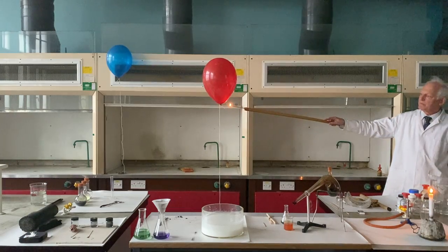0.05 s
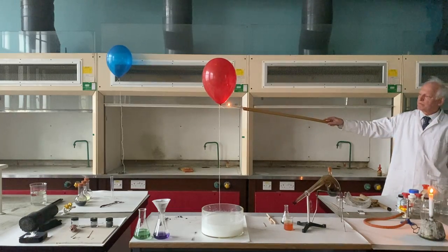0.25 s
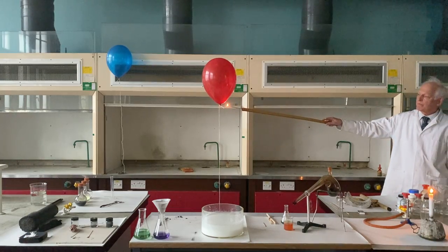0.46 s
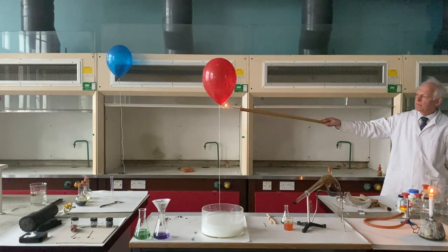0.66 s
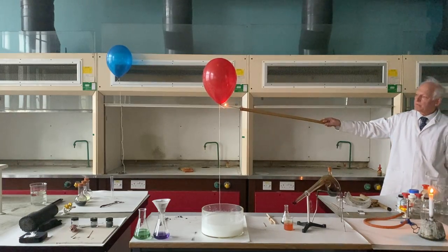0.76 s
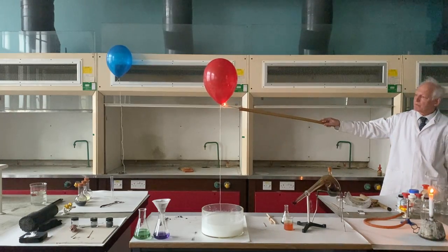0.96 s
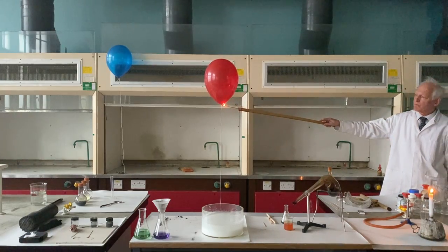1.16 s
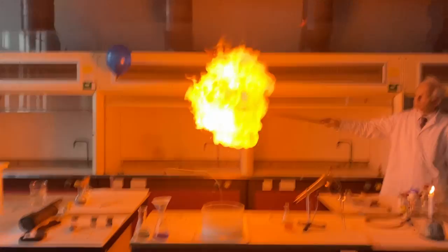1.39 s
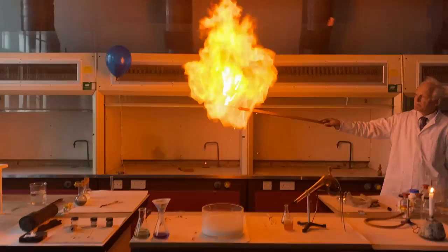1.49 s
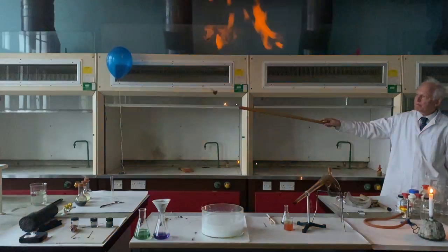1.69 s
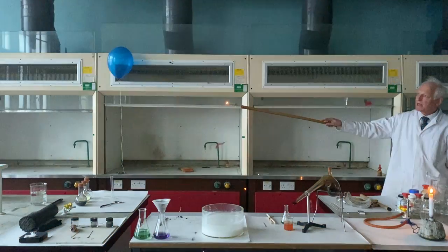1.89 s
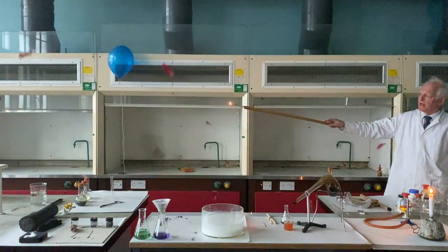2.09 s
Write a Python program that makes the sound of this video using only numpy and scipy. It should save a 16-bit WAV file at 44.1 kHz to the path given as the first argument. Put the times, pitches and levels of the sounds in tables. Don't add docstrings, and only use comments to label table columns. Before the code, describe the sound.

A hydrogen balloon explosion: low, rushing extractor fans hum steadily from the start, with one barely audible dry tick near 1.26 seconds. At 1.36 a violent bang hits abruptly, crunchy and clipped at the microphone, with a short fireball roar. Deep hums and dense echoes in the hard-walled laboratory fade gradually, while faint, bright glassware tinkles around 2.04 to 2.15 seconds.

```python
import sys
import numpy as np
from scipy import signal
from scipy.io import wavfile

SR = 44100
rng = np.random.default_rng(int(sys.argv[2]) if len(sys.argv) > 2 else 0)


def store_wav(level_fs):
    pcm = np.round(np.clip(np.atleast_2d(level_fs), -1, 1) * 32767)
    wavfile.write(sys.argv[1], SR, pcm.T.astype(np.int16))


def attenuation_scalar(level_db):
    decades = np.asarray(level_db, float) / 20
    return 10 ** decades


N = 94241


def at_hz(points, hz):
    pitches, values = np.transpose(points)
    return np.interp(np.log(hz), np.log(pitches), values)


def rms_one(x):
    return x / np.sqrt(np.mean(x ** 2) + 1e-20)


def filtered(x, order, cut_hz, kind="low"):
    return signal.sosfilt(signal.butter(order, cut_hz, kind, fs=SR, output="sos"), x)


def ring(x, hz, t60_s):
    decay = attenuation_scalar(-60 / (t60_s * SR))
    turn = 2 * np.pi * hz / SR
    return signal.lfilter([0, np.sin(turn)], [1, -2 * decay * np.cos(turn), decay ** 2], x + 1e-18)


def noise_bands():
    edges_hz = 20 * 2 ** np.arange(0, 10, 1 / 3)
    white = rng.standard_normal((2, N))
    bands = []
    for k, (low, high) in enumerate(zip(edges_hz, edges_hz[1:])):
        bands.append((np.sqrt(low * high), filtered(white[k % 2], 4, [low, high], "band")))
    return bands


def fans():
    # pitch_hz [Hz], density_db [dB per Hz]
    air_colour = [(25, 4), (160, -6.5), (220, -17), (570, -15), (830, -21.5), (2500, -34.5), (6500, -51),
                  (15000, -65)]
    # pitch_hz [Hz], width_hz [Hz], level_db [dB]
    ducts = [(63, 2.7, -47), (108.5, 15, -45), (132, 8, -84), (180.4, 15, -47.5), (235.4, 16, -54),
             (262.6, 2.1, -55.5), (361.6, 24, -57.5), (573, 33, -53)]
    air = sum(attenuation_scalar(at_hz(air_colour, hz)) * band for hz, band in noise_bands())
    out = attenuation_scalar(-41.5) * rms_one(air)
    for hz, width_hz, level_db in ducts:
        hum = ring(rng.standard_normal(N + SR), hz, 4.9 / width_hz)
        out += attenuation_scalar(level_db) * rms_one(hum[SR:])
    return out


def tick():
    start_s, level_db = 1.263, -47
    click = attenuation_scalar(level_db) * (np.arange(N) == int(start_s * SR))
    return filtered(click, 2, [4500, 16000], "band")


def glassware():
    # start_s [s], strength_db [dB]
    touches = [
        (2.038, -53.5),
        (2.048, -55),
        (2.059, -56),
        (2.071, -87),
        (2.088, -55),
        (2.104, -62),
        (2.117, -62),
    ]
    # pitch_hz [Hz], level_db [dB], t60_s [s]
    glass_modes = [(4630, -9, .03), (4900, -6, .06), (5507, -4, .05), (5905, -7, .05), (6433, -3, .04),
                   (7133, -7, .25), (7881, -12, .12), (8450, -12, .05), (9598, -15, .06), (10220, -10, .04),
                   (10340, -9, .07), (12030, -18, .08), (13830, -10, .07), (15600, -11, .1)]
    chatter_count, chatter_s, chatter_db = 6, 0.033, -2.5
    scuff_db, scuff_t60_s = 6, 0.024

    touch_s, touch_db = np.transpose(touches)
    later_s = touch_s[:, None] + chatter_s * rng.random((len(touch_s), chatter_count))
    start_s = np.concatenate([touch_s, later_s.ravel()])
    strength_db = np.concatenate([touch_db, np.repeat(touch_db, chatter_count) + chatter_db])
    at = np.minimum((start_s * SR).astype(int), N - 1)

    luck_db = rng.normal(0, 3.9, (len(start_s), len(glass_modes)))
    clicks, ringing = np.zeros(N), np.zeros(N)
    for k, (hz, level_db, t60_s) in enumerate(glass_modes):
        clicks[at] = attenuation_scalar(strength_db + level_db + luck_db[:, k])
        ringing += ring(clicks, hz, t60_s)

    clicks[at] = attenuation_scalar(strength_db + scuff_db)
    fading = signal.lfilter([1], [1, -attenuation_scalar(-60 / (scuff_t60_s * SR))], clicks)
    scuffs = filtered(fading * rng.standard_normal(N), 2, [4500, 8000], "band")
    return ringing + scuffs


def pressure_front():
    pulse_s, pulse_db, pulse_cut_hz = 0.0024, 25, 840
    early_db, early_t60_s, early_band_hz = 17.5, 0.26, [110.3, 552]
    t = np.arange(N) / SR
    ramp = np.where(t < pulse_s, 2 * t / pulse_s - 1, 0)
    pulse = attenuation_scalar(pulse_db) * filtered(ramp, 2, pulse_cut_hz)
    echoes = rms_one(filtered(rng.standard_normal(N), 2, early_band_hz, "band"))
    return pulse + echoes * attenuation_scalar(early_db - 60 * t / early_t60_s) * (t > pulse_s)


def fireball():
    rise_s, t60_s, share = 0.0077, 0.28, 0.051
    t = np.arange(N) / SR
    return share * rng.standard_normal(N) * (1 - np.exp(-t / rise_s)) * attenuation_scalar(-60 * t / t60_s)


def room_response():
    # pitch_hz [Hz], density_db [dB per Hz]
    room_colour = [(40, -52), (130, -16), (210, 2), (480, -3.5), (900, -13), (1900, -27.5), (4500, -42.5),
                   (12000, -71)]
    # pitch_hz [Hz], t60_s [s]
    room_fade = [(40, 1.07), (120, 1.47), (300, 1.175), (700, 1.236), (1600, 1.223), (4000, 0.97),
                 (10000, 1.1)]
    build_cycles = 0.74
    t = np.arange(N) / SR
    tail = np.zeros(N)
    for hz, band in noise_bands():
        fade = attenuation_scalar(at_hz(room_colour, hz) - 60 * t / at_hz(room_fade, hz))
        tail += fade * (1 - np.exp(-t * hz / build_cycles)) * band
    return tail / np.sqrt(np.mean(tail[:SR // 10] ** 2))


def bang():
    # pitch_hz [Hz], level_db [dB], t60_s [s]
    room_hums = [(22.89, 11.5, 0.68), (37.57, 10, 0.9), (94.7, 8, 0.71), (98.98, 5.5, 0.63),
                 (216.46, 8.5, 0.58), (452, -0.5, 0.78)]
    start_s, room_db = 1.3628, 1
    click = (np.arange(N) == 0) * 1.0
    echoing = attenuation_scalar(room_db) * signal.fftconvolve(click + fireball(), room_response())[:N]
    hums = sum(attenuation_scalar(level_db) * ring(click, hz, t60_s) for hz, level_db, t60_s in room_hums)
    return np.pad(pressure_front() + echoing + hums, (int(start_s * SR), 0))[:N]


def scene():
    return (fans() + tick() + glassware() + bang())[None]


def band_limit(x):
    return signal.sosfilt(signal.butter(12, 16800, fs=SR, output="sos"), x)


def record(dry):
    capsule_top, converter_top, hiss_db = 1.9, 0.7, -84.5
    x = np.clip(dry, -capsule_top, capsule_top)
    x = filtered(x, 1, 3200)
    x = filtered(x, 2, 42, "high")
    x = x + attenuation_scalar(hiss_db) * rng.standard_normal(x.shape)
    x = np.clip(x, -converter_top, converter_top)
    x = signal.sosfilt(signal.cheby2(10, 50, 16500, fs=SR, output="sos"), x)
    return band_limit(x)


dry = scene()
out = record(dry)
store_wav(out)
```